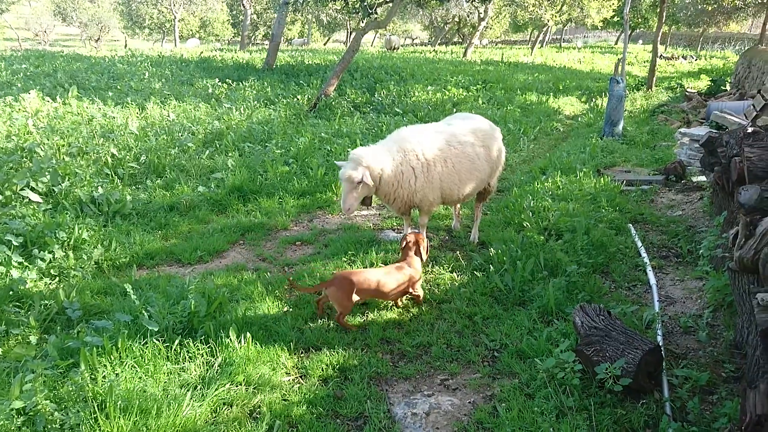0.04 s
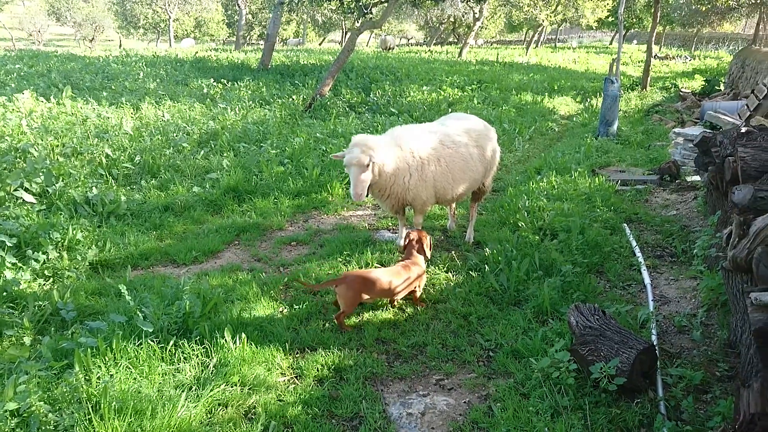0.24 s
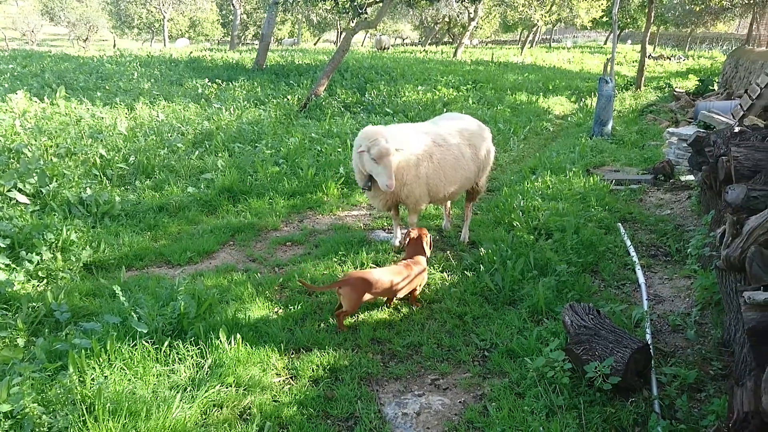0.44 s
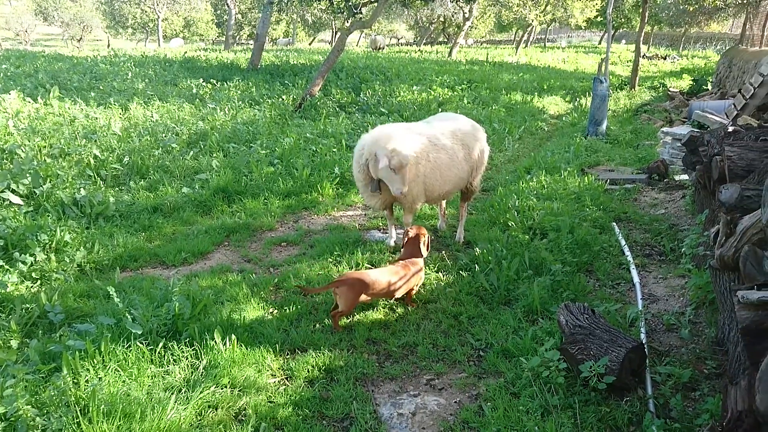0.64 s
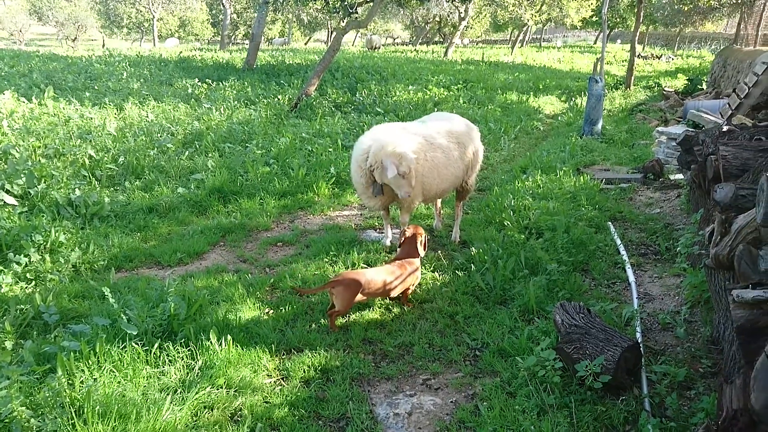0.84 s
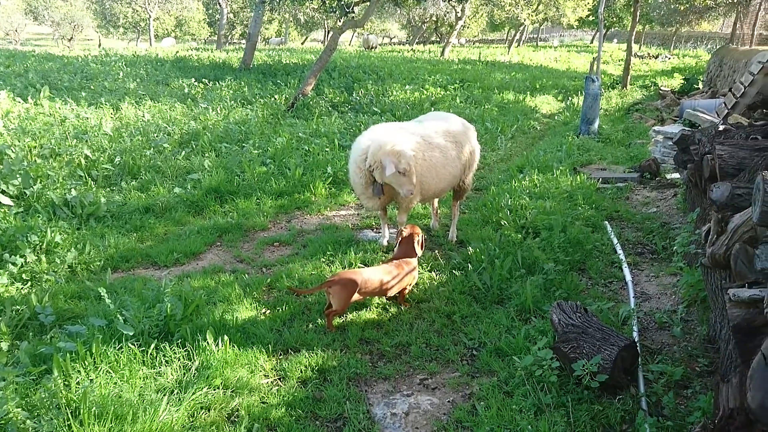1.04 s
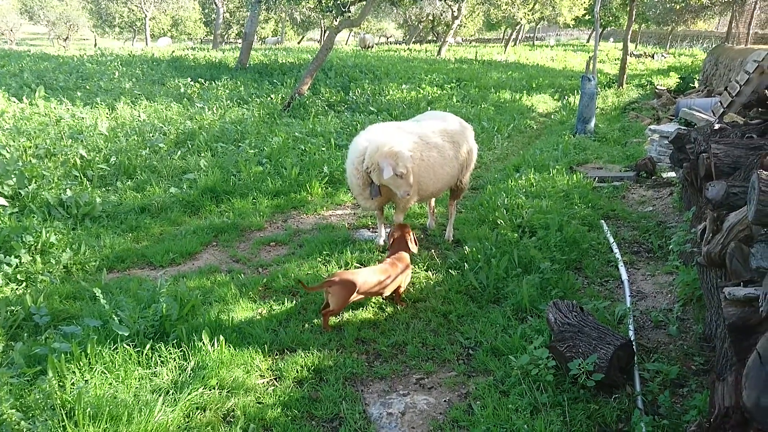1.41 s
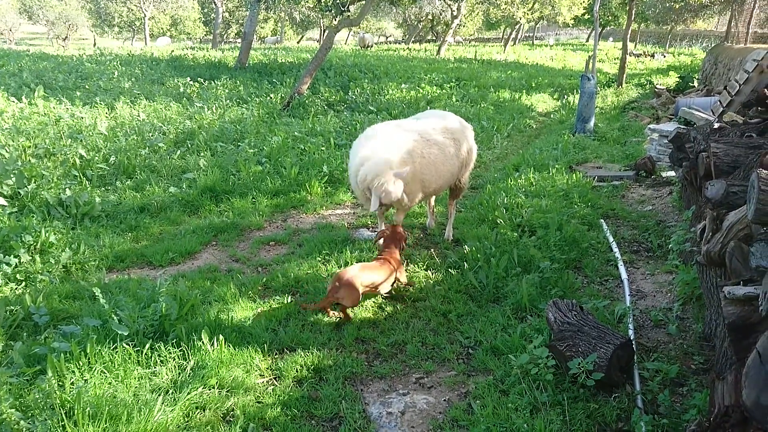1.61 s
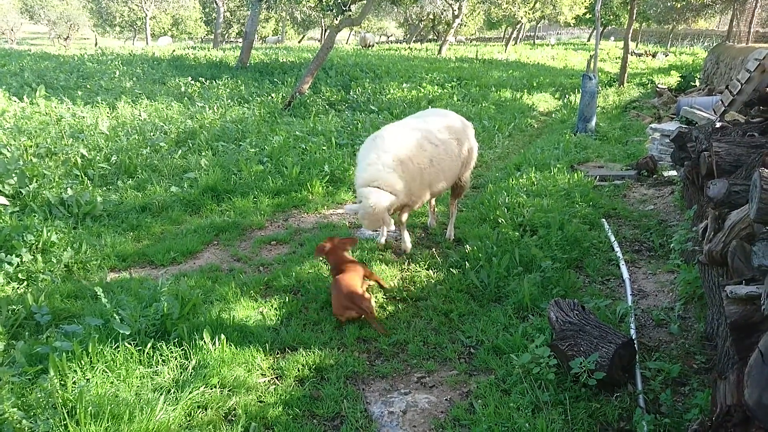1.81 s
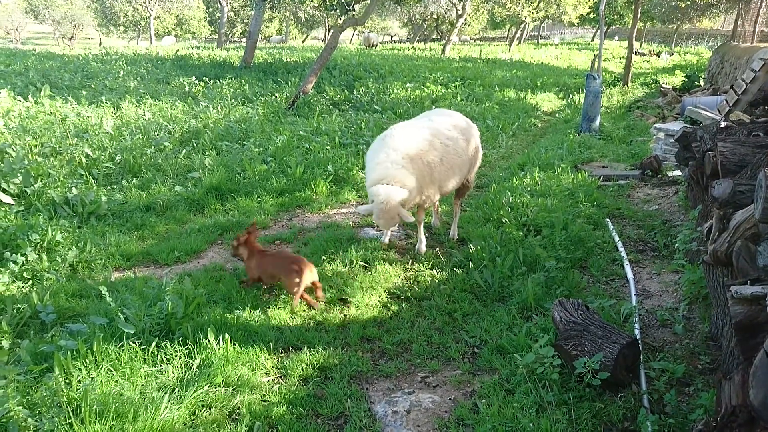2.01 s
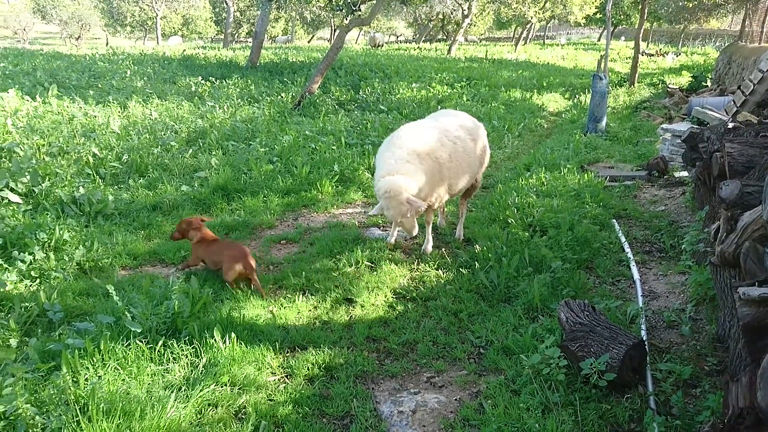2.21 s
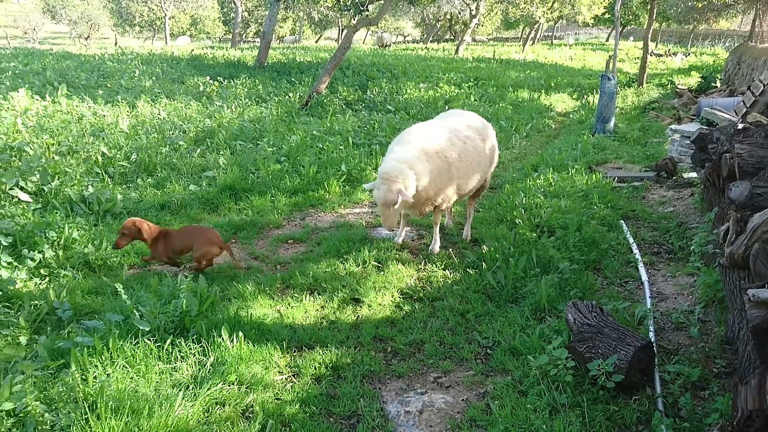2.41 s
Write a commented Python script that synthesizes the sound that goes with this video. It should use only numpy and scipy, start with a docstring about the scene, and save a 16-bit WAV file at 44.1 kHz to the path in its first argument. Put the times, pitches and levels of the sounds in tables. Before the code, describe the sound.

A sheep's metal bell clanks in a quick uneven run, pauses briefly, then clanks several more times. Grass rustles faintly in the second half as a small dog runs off, over quiet open meadow air.

```python
"""A sheet-metal bell clanks unevenly on the neck of a sheep that turns its head in a meadow.
Each clapper blow knocks the air in the bell, sets three low tones ringing and shakes out a bright
cluster of wall modes (the metal's own notes) that depends on where it lands.
Grass rustles as a small dog runs off; a faint low drone lies under the open air."""
import sys
import numpy as np
from scipy import signal
from scipy.fft import rfft, irfft
from scipy.io import wavfile
from scipy.ndimage import uniform_filter1d

SR = 44100
rng = np.random.default_rng(int(sys.argv[2]) if len(sys.argv) > 2 else 0)


def unload_audio(sound):
    """Save the sound as a 16-bit wav file, at the path given as the first command line argument."""
    columns = np.transpose(np.atleast_2d(sound))
    # keep every value between -1 and 1, then stretch to whole-number steps
    steps = np.round(np.clip(columns, -1, 1) * 32767)
    wavfile.write(sys.argv[1], SR, steps.astype(np.int16))


N = 112454

# Levels are relative. t60 is the time to fade by 60 dB; pan is left minus right.
# clapper blows: t/s, wall spot 0-4, knock/dB, hum/dB, second tone/dB, third tone/dB, low wall/dB,
# middle wall/dB, high wall/dB, hum t60/s, skid/dB, knock overtones/dB, hum fade power (1 = even fade)
BLOWS = [(-.04, 1, -52, -56.5, -68, -74, -67, -73, -80, 0.8, -76, 0, 1.05),
         (.084, 4, -43.5, -56.5, -67, -75.5, -62.5, -82, -86, 0.45, -83, 7, 1.2),
         (.154, 4, -51, -61, -71, -76, -62.5, -72, -87, 0.68, -81, 0, 1.),
         (.2308, 0, -23.5, -36, -47.5, -48, -44, -26.5, -33.5, 0.38, -55.5, 1, 2.01),
         (0.4308, 2, -31.5, -43.5, -67, -52.5, -53.5, -51, -51, 0.48, -61, 1, 1.14),
         (.5565, 1, -33.5, -43.5, -60, -62, -40.5, -43, -48, 0.46, -56, -11, 1.11),
         (.6725, 1, -31, -40, -68.5, -56.5, -54, -56, -70, 0.37, -66, -18, 0.92),
         (.711, 1.5, -47, -45, -81, -64, -49.5, -55.5, -62, 0.21, -74, -10, 1.38),
         (0.8394, 0, -31, -47, -48, -89, -43, -36, -42, 0.29, -55, 0, 1.7),
         (1.3359, 2, -25.5, -38.5, -64.5, -54, -41.5, -37.5, -39, 0.52, -57.5, -17, 0.96),
         (1.7221, 3.5, -48.5, -58, -51.5, -53, -41, -40, -40.5, 0.18, -47.5, 8, 1.37),
         (1.8635, 2.5, -20.5, -44, -52.5, -51.5, -42.5, -37.5, -46.5, 0.36, -47, 5.5, 1.27),
         (1.9816, 3.5, -28, -47.5, -57, -64.5, -39.5, -36.5, -44, 0.4, -47.5, 11, 1.3),
         (2.2481, 4, -30, -32, -67, -69, -40.5, -38, -45, 0.27, -58.5, 13, 1.2),
         (2.294, 4, -42, -45, -53, -87, -55, -57, -53.5, 0.27, -70, 8, 1.17)]
# wall modes: f/Hz, t60/s, pan/dB, then level/dB when struck at each of spots 0-4
WALL = [(3542, 0.42, 6, -26, -16, -18, -12, -19), (3728, 0.5, 6, -3, -13, -12, -22, -24),
        (3866, 0.17, 5, -6, -15, -2, -2, -18), (4007, 0.19, 9, -15, -9, -17, -13, -1),
        (4895, 0.17, 5, -6, -1, -7, -6, -11), (5329, 0.16, 1, -32, -10, -28, -26, -19),
        (5556, 0.17, -10, -38, -22, -14, -11, -15), (5722, 0.19, -7, -17, -13, -10, -16, -10),
        (5895, 0.19, -1, -25, -18, -21, -25, -20), (6245, 0.12, -7, -19, -14, -6, -20, -20),
        (6729, 0.12, -9, -30, -21, -18, -11, -27), (7210, 0.13, -11, -27, -19, -15, -16, -7),
        (7404, 0.14, -14, -18, -13, -9, -13, -28), (7553, 0.115, -20, -2, -8, -9, -21, -29),
        (8479, 0.14, -16, -17, -9, -16, -16, -14), (8624, 0.145, -26, -5, -16, -9, -17, -10),
        (8895, 0.13, -21, -15, -11, -9, -2, -11), (9109, 0.15, -24, -19, -7, -28, -17, -8),
        (9399, 0.17, -18, -26, -19, -19, -18, -31), (9683, 0.15, -23, -22, -11, -25, -29, -6),
        (10546, 0.17, -9, -27, -27, -16, -11, -26), (11499, 0.15, -11, -7, -7, -11, -10, -14),
        (11698, 0.14, -12, -3, -7, -11, -13, -13), (11779, 0.13, -10, -12, -9, -2, -14, -15),
        (12060, 0.14, -6, -17, -8, -21, -12, -11), (12435, 0.15, -11, -12, -12, -22, -17, -21),
        (12699, 0.14, -13, -17, -8, -10, -16, -18), (13001, 0.15, -13, -22, -23, -17, -5, -6),
        (13194, 0.16, -12, -13, -16, -12, -9, -3), (13598, 0.16, -20, -18, -17, -15, -9, -17),
        (15450, 0.16, -18, -21, -16, -27, -17, -18), (15660, 0.15, -21, -31, -25, -22, -20, -25)]
WALL_SPLITS_HZ = 5100, 10000  # borders of the low, middle and high wall bands
WALL_ATTACK_S, TOP_HZ = 0.0015, 16200
# tone colour of the crack, the skid and the shimmer: f/Hz, level/dB
METAL_COLOUR = [(900, 0), (2400, -0.5), (4000, 4.5), (5500, -1.5), (7000, 2), (8800, 7.5), (10800, -12),
                (12500, 5), (14300, -6), (14750, -7), (15500, -4), (16300, -18)]
# where the treble sits, mostly to the right: f/Hz, pan/dB
TREBLE_PAN = [(2000, -8), (4200, 19), (6000, -1.5), (8500, -17), (12000, -9.5), (16000, -18)]


def undb(db):
    return 10 ** (np.asarray(db) / 20)


def unit(x):
    return x / np.sqrt(np.mean(x ** 2))


def pan(db):
    """Left and right gains of equal total power."""
    gains = undb(np.array([[.5], [-.5]]) * db)
    return gains / np.sqrt(np.mean(gains ** 2, axis=0))


def sides(lead_rad):
    """Phase shifts that put the left side ahead of the right."""
    return np.array([[.5], [-.5]]) * lead_rad


def along(points, hz):
    """Read a curve of (f/Hz, value) points on a pitch-like axis."""
    freqs, values = np.array(points, float).T
    return np.interp(np.log(hz + 1), np.log(freqs), values)


def colour(x, points):
    """Give noise a tone colour, at a level of 1."""
    return unit(irfft(rfft(x) * undb(along(points, np.fft.rfftfreq(N, 1 / SR))), N))


def lean(x):
    """Place a bright sound where the bell is."""
    return irfft(rfft(x) * pan(along(TREBLE_PAN, np.fft.rfftfreq(N, 1 / SR))), N)


def wobble(rate_hz):
    """A smooth random curve with a spread near 1."""
    hold = int(SR / rate_hz)
    steps = np.repeat(rng.standard_normal(N // hold + 1), hold)
    return unit(uniform_filter1d(uniform_filter1d(steps, hold), hold)[:N])


def ring(age, t60, attack):
    """Rise quickly, then die away."""
    age = np.maximum(age, 0)
    return (1 - np.exp(-age / attack)) * np.exp(-np.log(1000) * age / t60)


def add(out, start, sound):
    """Mix a sound in at its time."""
    i = int(start * SR)
    lo, hi = max(i, 0), min(i + sound.shape[1], N)
    out[:, lo:hi] += sound[:, lo - i:hi - i]


def meadow(t):
    """Open air, alike on both sides in the bass, and a wavering drone from far away."""
    # tone colour of the air: f/Hz, level/dB
    air_colour = [(20, -47), (36, -21), (52, -0.5), (75, -1.5), (130, -3), (190, -9.5), (300, -16),
                  (500, -17.5), (1000, -18), (2000, -22.5), (4500, -29.5), (9000, -32), (13000, -38),
                  (16000, -39)]
    # notes of the drone: f/Hz, level/dB
    drone_notes = [(53, -75.5), (105, -74.5), (131, -72), (157, -78), (236, -83.5), (262, -83),
                   (340, -87.5)]
    mid, side = (colour(rng.standard_normal(N), air_colour) for _ in range(2))
    width = along([(150, 0.38), (600, 1)], np.fft.rfftfreq(N, 1 / SR))
    air = undb(-68.5) * (mid + irfft(rfft(side) * width, N) * np.array([[1], [-1]]))
    drone = 0
    for hz, db in drone_notes:
        swell = 1 + 0.45 * wobble(8.84)
        drone += undb(db) * unit(swell * np.sin(2 * np.pi * hz * t + wobble(7.4)))
    return pan(-3) * (air + drone)


def grass_rustle(t):
    """A small dog brushes unevenly through the grass."""
    # loudness of the rustle: t/s, level/dB
    loudness = [(0, -84.5), (1.58, -96.5), (1.65, -67), (1.71, -67.5), (1.78, -71.5), (1.95, -69),
                (2.12, -67.5), (2.22, -67.5), (2.36, -75), (2.55, -89)]
    # its tone colour: f/Hz, level/dB
    grass_colour = [(1000, 5), (3000, -6), (6000, -1.5), (8700, 0.5), (10700, -12), (13000, 0.5),
                    (15000, -13.5)]
    hiss = lean(colour(rng.standard_normal((2, N)), grass_colour))
    flicker_db = 4 * wobble(220) + 1.02 * wobble(20)
    return hiss * undb(np.interp(t, *np.array(loudness).T) + flicker_db)


def echoes(x):
    """Faint scatter from the ground, the trees and a woodpile."""
    age, delay_s = np.arange(SR // 2) / SR, 0.0027
    tail = rng.standard_normal((2, len(age))) * ring(age - delay_s, t60=0.22, attack=delay_s)
    tail /= np.sqrt(np.sum(tail ** 2, axis=1, keepdims=True))
    return undb(-15) * signal.fftconvolve(x, tail, axes=1)[:, :N]


def through_wall(x, width_hz=61, bypass=0.31):
    """Let rubbing noise sing in the wall modes; a little passes them by."""
    hz = np.fft.rfftfreq(N, 1 / SR)
    power = sum(1 / (1 + (2 * (hz - mode_hz) / width_hz) ** 2) for mode_hz, *_ in WALL)
    return unit(irfft(rfft(x) * np.sqrt(power + bypass ** 2), N))


def crack_and_skid(t):
    """The crack of metal on metal, and the rough skid of the clapper along the wall."""
    noise = lean(colour(rng.standard_normal(N) + 0.47 * rng.standard_normal((2, N)), METAL_COLOUR))
    band = np.searchsorted(WALL_SPLITS_HZ, np.fft.rfftfreq(N, 1 / SR))
    band_noise = np.array([unit(irfft(rfft(noise) * (band == b), N)) for b in range(3)])
    crack_level, skid_level = 0, 0
    for start, _, _, _, _, _, *wall_db, _, skid_db, _, _ in BLOWS:
        crack_level += undb(wall_db)[:, None] * ring(t - start, t60=0.017, attack=WALL_ATTACK_S)
        skid_level += undb(skid_db) * ring(t - start, t60=.17, attack=.002)
    crack = undb(0.5) * np.sum(band_noise * crack_level[:, None], axis=0)
    skid = through_wall(noise) * skid_level * undb(1.5 * wobble(300))
    return crack + skid


def shimmer(count=70):
    """Many weak wall modes between the strong ones, shaken anew by each blow."""
    out, age = np.zeros((2, N)), np.arange(SR // 5) / SR
    hz = WALL_SPLITS_HZ[0] + (TOP_HZ - WALL_SPLITS_HZ[0]) * (np.arange(count) + rng.random(count)) / count
    modes = ring(age, t60=0.28, attack=WALL_ATTACK_S) * np.exp(2j * np.pi * hz[:, None] * age)
    band = np.searchsorted(WALL_SPLITS_HZ, hz)
    gain = undb(-23.5) * unit(undb(along(METAL_COLOUR, hz))) / np.sqrt(count)
    gain = gain * pan(along(TREBLE_PAN, hz))
    for start, _, _, _, _, _, *wall_db, _, _, _, _ in BLOWS:
        shake = rng.standard_normal((2, count)) + 1j * rng.standard_normal((2, count))
        add(out, start, ((shake * gain * undb(wall_db)[band]) @ modes).imag)
    return out


def low_tones(t, usual_t60=0.45, usual_power=1.23, attack_s=0.0013):
    """Each blow restarts three low tones; wool settles on the bell and damps the lowest, the hum."""
    # each tone and its weak twin, which makes it throb:
    # t60 multiplier, pan/dB, left lead/rad, twin offset/Hz, twin level/dB
    tones = [(1., -6, 0.58, 2.81, -22.5), (1.5, -4, 1.7, 4.11, -9), (2., -4.5, -1.3, 3.82, -8)]
    tone_hz = 881, 1882.3, 2198.7
    blows = np.array(BLOWS)
    latest = blows[np.maximum(np.searchsorted(blows[:, 0], t, side="right") - 1, 0)].T
    start, _, _, hum_db, second_db, third_db, _, _, _, hum_t60, _, _, hum_power = latest
    fades = [(hum_db, hum_t60, hum_power)] + [(db, usual_t60, usual_power) for db in (second_db, third_db)]
    age, out = np.maximum(t - start, 0), 0
    smooth = np.exp(-1 / (attack_s * SR))
    for hz, (stretch, pan_db, lead, twin_hz, twin_db), (db, t60, power) in zip(tone_hz, tones, fades):
        level = undb(db) * np.exp(-np.log(1000) * (age / (t60 * stretch)) ** power)
        level = signal.lfilter([1 - smooth], [1, -smooth], level)
        twin = undb(twin_db) * np.sin(2 * np.pi * ((hz + twin_hz) * t + rng.random((2, 1))))
        out += level * pan(pan_db) * (np.sin(2 * np.pi * hz * t + sides(lead)) + twin)
    return out


def knocks(knock_hz=1077):
    """Hollow knocks, brighter when the clapper hits hard; a soft touch also leaves a faint low ring."""
    # notes of the bell's mouth: frequency ratio, t60/s, level/dB, pan/dB
    mouth_notes = [(1.002, 0.032, 1, -7.5), (1.109, 0.03, -17.5, -26), (1.35, 0.024, -18.5, -2.5),
                   (2.55, 0.025, -28, 2), (3.06, 0.054, -38, 10), (0.756, 0.36, -37.5, -19)]
    # soft touches of the clapper: t/s, level/dB
    touches = [(.125, -64.5), (.53, -51), (1.03, -56.5), (1.05, -53)]
    out, age = np.zeros((2, N)), np.arange(SR // 2) / SR

    def note(hz, t60):
        return ring(age, t60, attack=0.0017) * np.sin(2 * np.pi * hz * age + sides(.6))

    def knock(overtone_db):
        return sum(undb(db + overtone_db * (ratio > 1.05)) * pan(pan_db) * note(knock_hz * ratio, t60)
                   for ratio, t60, db, pan_db in mouth_notes)

    for start, _, db, *_, overtone_db, _ in BLOWS:
        add(out, start, undb(db) * knock(overtone_db))
    for start, db in touches:
        add(out, start, undb(db) * (knock(0) + undb(-11) * note(hz=817.7, t60=0.63)))
    return out


def clanks():
    """Each blow rings the wall modes; the swinging bell sends them out a little differently each time."""
    out, age = np.zeros((2, N)), np.arange(SR // 2) / SR
    hz, t60, pan_db, *spot_db = np.array(WALL, float).T
    modes = ring(age, t60[:, None], WALL_ATTACK_S) * np.exp(2j * np.pi * hz[:, None] * age)
    band = np.searchsorted(WALL_SPLITS_HZ, hz)
    for start, spot, _, _, _, _, *wall_db, _, _, _, _ in BLOWS:
        swing_db, side_db, lead, turn = rng.standard_normal((4, len(hz)))
        gain = undb(np.array(wall_db)[band] + spot_db[round(spot)] + swing_db) * pan(pan_db + side_db)
        phase = np.pi * turn + sides(1.4 * lead)
        add(out, start, ((gain * np.exp(1j * phase)) @ modes).imag)
    return out


def scene():
    t = np.arange(N) / SR
    strikes = knocks() + clanks() + shimmer() + crack_and_skid(t)
    bass_cut = signal.butter(5, 620, "high", fs=SR, output="sos")  # the bell's sound holds little below about 600 Hz
    bell = signal.sosfilt(bass_cut, low_tones(t) + strikes + echoes(strikes))
    return bell + grass_rustle(t) + meadow(t)


def record(dry):
    """Cut the highest treble."""
    return signal.sosfilt(signal.ellip(8, .2, 70, TOP_HZ, fs=SR, output="sos"), dry)


dry = scene()
out = record(dry)
unload_audio(out)
```